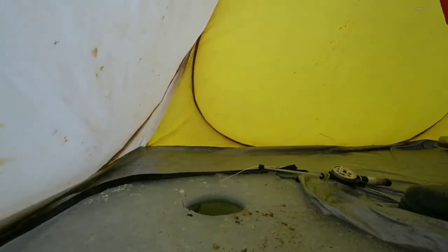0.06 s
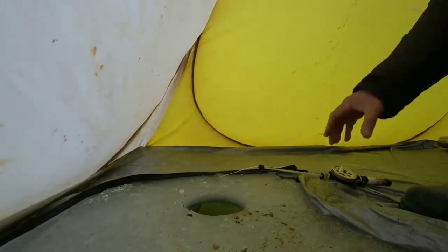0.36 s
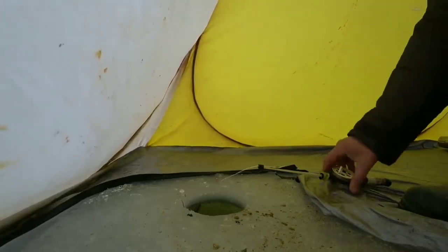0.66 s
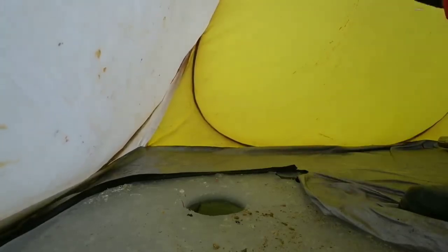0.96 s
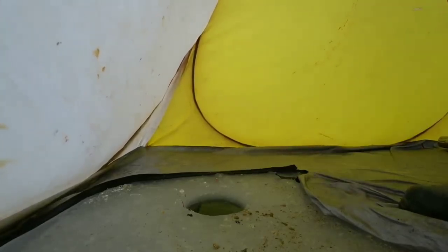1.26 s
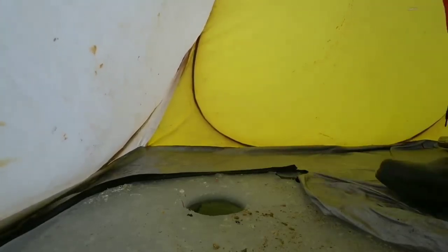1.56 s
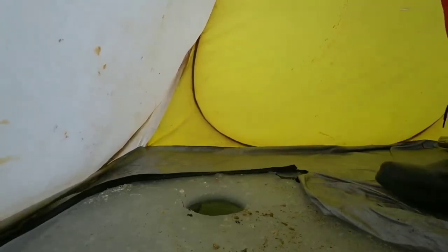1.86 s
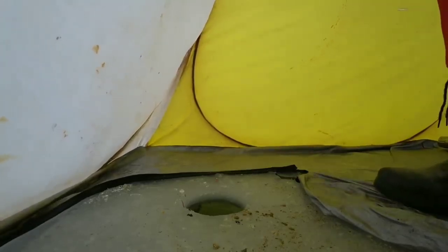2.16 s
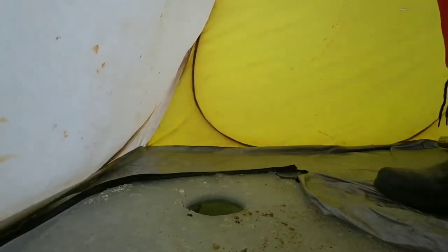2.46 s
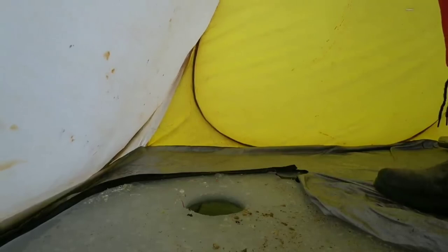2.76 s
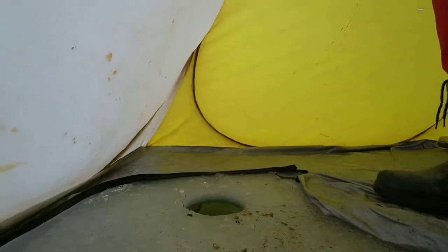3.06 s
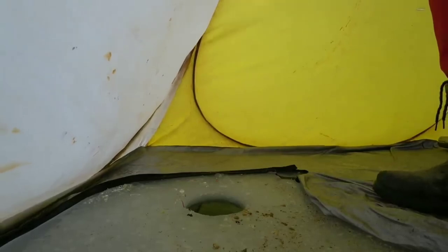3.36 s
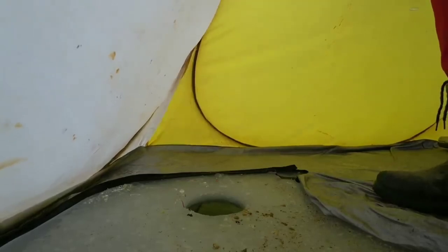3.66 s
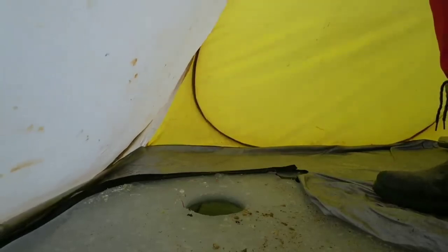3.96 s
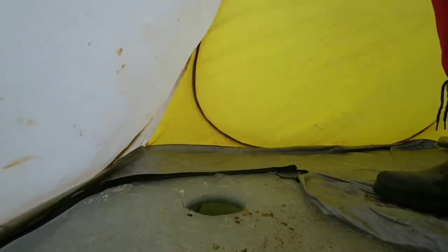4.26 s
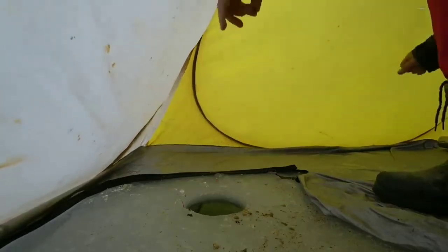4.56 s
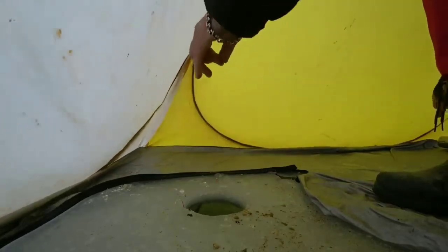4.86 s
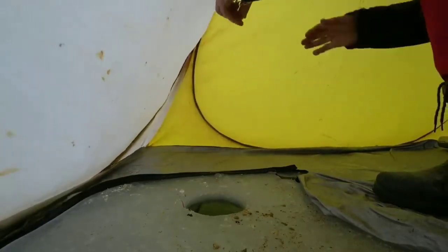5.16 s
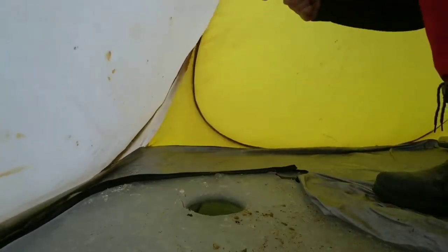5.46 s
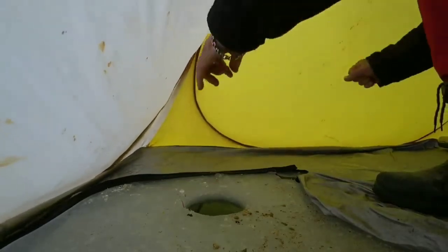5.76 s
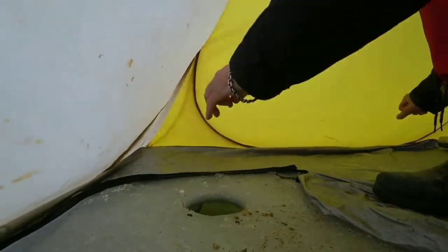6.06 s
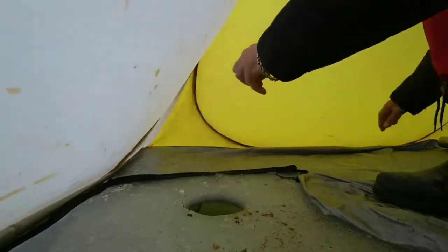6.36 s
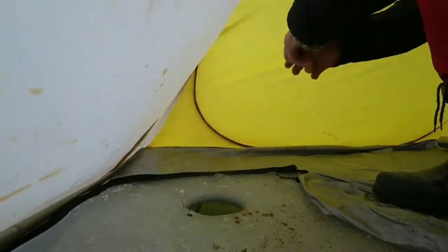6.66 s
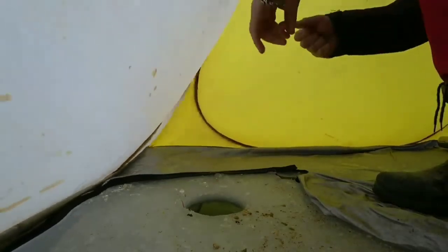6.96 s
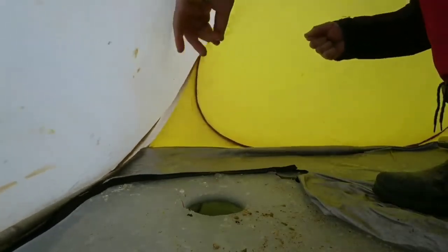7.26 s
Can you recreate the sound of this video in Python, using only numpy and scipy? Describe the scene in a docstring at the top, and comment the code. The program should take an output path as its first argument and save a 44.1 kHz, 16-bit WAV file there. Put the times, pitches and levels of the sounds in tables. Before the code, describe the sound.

Close, dry rustling and scraping of a nylon jacket fills a small fishing tent, over a faint low wind. After a few sleeve swishes and a short lull come a dull floor knock and a hard click of tackle. Creases snap and small gear taps lightly as the movement picks up. Finally the tent wall heaves with deep, soft thumps and a quick run of taut flaps.

```python
"""A padded jacket moves in a small ice-fishing tent: nylon slides on nylon in tiny stick-slips,
creases buckle and snap, tight cloth squeaks. The loose wall billows and pulls taut, hardest near the end.
A dull floor knock, a clack of hard tackle and light taps of taut fabric and small gear ring as
decaying modes. The thin walls add a very short reverb; wind rumbles low outside."""
import sys
import numpy as np
from scipy import signal
from scipy.fft import rfft, irfft, next_fast_len
from scipy.io import wavfile
from scipy.ndimage import uniform_filter1d, map_coordinates

SR = 44100
rng = np.random.default_rng(int(sys.argv[2]) if len(sys.argv) > 2 else 0)


def file_out(sig):
    """Save sig as 16-bit WAV at sys.argv[1]."""
    # one column per channel
    cols = np.atleast_2d(sig).T
    # limit, then scale
    lim = np.clip(cols, -1, 1)
    pcm = np.round(lim * 32767).astype(np.int16)
    wavfile.write(sys.argv[1], SR, pcm)


N = 326736

# sleeve strokes: (start [s], attack [s], hold [s], 20 dB fade [s], rub [dB], hiss over rub [dB])
SLEEVE_STROKES = [(-0.03, 0.058, 0.053, 0.13, -38, 0.5), (0.21, .13, .33, 1, -50.5, 4),
                  (0.735, 0.14, .2, 0.56, -39.5, -3.5), (1.091, .004, 0.063, 0.31, -35.5, 2.5),
                  (1.304, 0.14, 0.032, 0.22, -38, 3.5), (2.328, .12, 0.065, 0.7, -53, 7.5),
                  (2.746, 0.02, 0.017, 0.23, -44.5, 1.5), (2.93, 0.046, 0.18, .12, -38.5, -1),
                  (3.116, 0.033, .05, 0.34, -37, 0), (3.204, 0.074, 0.24, .13, -39.5, -2),
                  (3.612, 0.071, 0.29, 0.4, -38.5, -2), (4.344, 0.046, 0.25, 0.7, -38.5, 0),
                  (4.694, .05, .06, 0.09, -30, -6), (4.822, 0.049, .12, 1.5, -46.5, -12),
                  (4.976, .14, 0.11, 0.04, -40, 3), (5.16, 0.11, 0.045, 0.2, -35.5, -4),
                  (5.502, .13, 0.035, 0.33, -33, 0.5), (5.898, 0.088, 0.036, .085, -32.5, -8),
                  (6.2, 0.0058, 0.021, .13, -31, -7.5), (6.339, 0.024, 0.011, 0.08, -29, -6),
                  (6.392, 0.033, .17, 2, -40.5, -4), (6.573, 0.13, 0.16, .2, -33, -4),
                  (6.77, 0.06, .025, 0.27, -31, -4), (6.945, 0.014, 0.15, .15, -30, -3),
                  (7.133, 0.013, 0.067, 0.5, -32.5, -2.5)]
# rustle between strokes: (time [s], level [dB])
IDLE_RUSTLE = [(0.0, -50.5), (1.7, -50.5), (1.78, -54.5), (2.3, -57.5), (2.85, -53), (3.6, -55.5),
               (4.15, -48.5), (5.45, -49.5), (5.9, -45.5), (7.41, -50.5)]
# arm position: (time [s], left over right [dB])
ARM_PAN = [(0.0, -3.5), (4.62, -1.5), (4.7, 1), (5.16, -2), (5.26, 0), (5.86, -2.5), (5.92, 2), (6.27, 0.0),
           (6.33, 4.0), (6.67, -4.5), (7.04, 0), (7.41, -2.5)]
# nylon rub: (frequency [Hz], level [dB])
RUB_SPECTRUM = [(300, -28), (700, -9), (1100, -4), (1600, -0.5), (2100, -1), (2700, 0), (3500, -3.5),
                (4200, -9), (6000, -11), (11000, -47)]
# nylon hiss: (frequency [Hz], level [dB])
HISS_SPECTRUM = [(2000, -17), (3500, -2), (4600, -1.5), (5600, 2.5), (7200, 2), (8300, -1.5), (9300, -6.5),
                 (10400, -2), (11300, -13)]
# buckling creases: (time [s], level [dB], centre [Hz])
CREASE_SNAPS = [(1.0178, -19, 5000), (1.0235, -22, 2400), (1.387, -21, 1620), (1.567, -20.5, 1800),
                (2.116, -28, 1470), (2.533, -27, 1790), (3.728, -21, 2850), (4.273, -23.5, 3560),
                (4.358, -22, 3400), (4.38, -19, 1500), (4.678, -9.5, 3400), (4.7024, -10.5, 3500),
                (4.784, -12, 2900), (5.389, -19.5, 2000), (5.466, -22.5, 2520), (5.71, -22, 2000),
                (6.151, -19.5, 2800), (6.478, -16, 2000), (6.857, -11, 2400)]
# crease snap and floor rattle: (frequency [Hz], level [dB])
SNAP_SPECTRUM = [(150, -30), (600, 7), (1500, 0), (2600, 3), (3600, 2.5), (4300, -5.5), (7500, -1),
                 (11000, -18)]
# quick sleeve brushes: (time [s], level [dB], length [s], centre [Hz])
SLEEVE_SCUFFS = [(0.77, -36, 0.026, 1800), (0.813, -35, .025, 3970), (0.877, -33, 0.049, 8400),
                 (1.096, -25.5, 0.014, 6040), (1.261, -35, 0.017, 1940), (1.556, -34.5, 0.06, 2800),
                 (1.714, -38.5, 0.042, 1870), (2.123, -45.5, .04, 2800), (2.636, -39.5, 0.038, 3150),
                 (2.687, -41, 0.041, 2970), (3.1, -27, 0.027, 4970), (3.109, -26, .025, 2200),
                 (3.158, -29.5, 0.038, 2270), (3.908, -34, 0.037, 1500), (4.678, -27, 0.028, 2600),
                 (6.14, -37, .035, 2480), (6.203, -35, .05, 1200), (6.349, -28.5, 0.037, 1490),
                 (6.441, -32.5, 0.026, 2980), (7.026, -23, .04, 2000)]
# nylon squeaks: (time [s], level [dB], length [s], start pitch [Hz], end pitch [Hz], overtones [dB])
NYLON_SQUEAKS = [(1.045, -39.5, 0.14, 2600, 2580, -14), (1.447, -32, 0.069, 4080, 4310, -4),
                 (2.974, -37.5, 0.046, 1120, 1010, -21), (3.182, -34, 0.048, 3440, 3400, -14),
                 (3.237, -41, 0.066, 2660, 2720, -21), (3.78, -39, 0.068, 1147, 1186, -13),
                 (4.467, -38, 0.08, 3160, 2300, -23)]
# wall heaves: (centre [s], length [s], billow [dB], flutter over billow [dB])
WALL_HEAVES = [(0.9, 0.083, -40.5, -10), (1.14, 0.099, -45.5, 6.5), (2.702, 0.062, -44, -13),
               (2.975, 0.069, -39.5, -0.5), (3.38, .1, -53, 9.5), (3.515, 0.049, -41, -21),
               (3.854, 0.17, -44.5, -6), (4.577, 0.079, -30.5, -8), (4.767, 0.14, -38.5, 3.5),
               (4.884, 0.043, -32, -15), (5.302, 0.16, -40, 3.5), (5.558, .07, -27, -7),
               (5.677, 0.13, -31.5, -2), (5.99, 0.068, -36.5, -1.5), (6.305, 0.2, -29, -7.5),
               (6.473, 0.11, -27.5, -8.5), (6.685, 0.16, -34, 0.5), (6.846, .07, -31.5, -8),
               (7.032, 0.14, -14, -8.5), (7.227, 0.13, -16, -7.5), (7.405, 0.033, -29, 1.5)]
# wall motion between heaves: (time [s], billow [dB])
WALL_STIR = [(0.0, -51), (2.3, -55.5), (3.2, -58), (4.2, -45.5), (4.6, -41.5), (5.45, -39.5), (5.95, -38.5),
             (6.75, -34.5), (7.41, -24.5)]
# wall billow: (frequency [Hz], level [dB])
BILLOW_SPECTRUM = [(10, -21), (28, 3), (50, -2.5), (80, -3.5), (125, -4), (190, -8.5), (280, -15.5),
                   (500, -29.5), (1500, -59)]
# wall flutter: (frequency [Hz], level [dB])
FLUTTER_SPECTRUM = [(80, -19), (200, -7), (320, 0.5), (480, -4.5), (720, -5.5), (1000, -10), (1600, -19),
                    (4000, -50)]
# air pushed by the wall: (frequency [Hz], level [dB])
DRAUGHT_SPECTRUM = [(20, 10), (70, -10.5), (160, -5.5), (300, 0.5), (700, -18), (2000, -60)]
# wall pulling taut: (time [s], level [dB], pitch [Hz])
WALL_FLAPS = [(0.118, -31, 327), (1.136, -21.5, 750), (3.914, -23, 480), (4.378, -32, 750),
              (4.439, -20, 450), (4.445, -22, 720), (4.563, -20, 263), (4.678, -20, 437), (4.886, -27, 337),
              (5.462, -21, 720), (5.481, -23, 396), (5.712, -13.5, 655), (5.734, -20, 610),
              (6.151, -20.5, 170), (6.402, -16, 480), (6.879, -14, 370), (6.962, -6.5, 500),
              (7.04, -4.5, 820), (7.052, -9, 447), (7.164, -3, 360), (7.2005, 1.5, 750), (7.2047, -4, 336),
              (7.232, -10, 306), (7.287, -16, 218)]
# puff of a flap: (frequency [Hz], level [dB])
PUFF_SPECTRUM = [(100, -7.5), (700, -1), (1500, -5.5), (2400, -18), (8000, -55)]
# floor knock modes: (frequency [Hz], level [dB], T60 [s])
KNOCK_MODES = [(148, -7.5, 0.032), (215, -9.5, 0.04), (346, -16.5, 0.038), (490, -5, 0.016),
               (645, -1.5, 0.011), (1130, -11.5, 0.017), (1500, -20, 0.018), (2590, -29.5, 0.14)]
# tackle modes: (frequency [Hz], bandwidth [Hz], level [dB])
TACKLE_MODES = [(2030, 29, 0), (2210, 26, -3), (2520, 140, -7), (2730, 26, -10), (2900, 22, -11),
                (3160, 41, -9), (3690, 30, -6), (4270, 100, -4), (4530, 49, -9), (4800, 41, -4),
                (5260, 36, -11), (5490, 34, -9), (5720, 62, -7), (6020, 36, -12), (6490, 36, -15),
                (6720, 19, -17), (6900, 31, -10), (7350, 61, -13)]
# tackle contacts: (time [s], level [dB])
TACKLE_CONTACTS = [(3.1125, -30), (3.1148, -12), (3.1195, -17.5), (3.163, -34), (3.177, -33)]
# tackle contact noise: (frequency [Hz], level [dB])
CRACK_SPECTRUM = [(200, -40), (900, 2.5), (1600, -10), (2100, 6), (3200, 0), (5000, -2), (7300, -13),
                  (7900, -13), (11000, -14)]
# ringing taps and chinks of taut fabric and small gear: (time [s], level [dB], pitch [Hz], T60 [s])
LIGHT_TAPS = [(3.728, -25, 2900, .035), (4.38, -23, 770, 0.047), (4.379, -25, 1360, 0.045),
              (5.027, -22, 5360, 0.03), (5.035, -19.5, 1890, 0.051)]
# tent reverb: (frequency [Hz], T60 [s])
TENT_DECAY = [(150, 0.026), (1500, 0.028), (4000, 0.073), (11000, 0.14)]
# wind outside: (frequency [Hz], level [dB])
WIND_SPECTRUM = [(15, -10), (35, -10), (70, 0), (130, -0.5), (220, -3.5), (330, -7), (600, -16),
                 (2000, -25), (10000, -35.5)]
# left-right likeness: (frequency [Hz], correlation [-])
STEREO_CORRELATION = [(60, .96), (250, .9), (500, .82), (1200, .6), (2500, .68), (9000, .72)]

CONTROL_S = np.arange(0, N / SR, 1 / 500)


def amp(db):
    """Decibels to gain."""
    return 10 ** (np.asarray(db) / 20)


def unit(x):
    """Scale to rms 1."""
    return x / np.sqrt(np.mean(x ** 2) + 1e-20)


def along(points, hz):
    """Interpolate a table on a log frequency axis."""
    knots_hz, values = np.transpose(points)
    return np.interp(np.log(hz + 1), np.log(knots_hz + 1), values)


def power_to_db(power):
    """Control-rate power to dB per sample."""
    return np.interp(np.arange(N) / SR, CONTROL_S, 10 * np.log10(power))


def wobble(rate_hz, size=N):
    """Smooth random curve, rate_hz knots a second."""
    knots = rng.standard_normal(int(size * rate_hz / SR) + 4)
    return map_coordinates(knots, [np.arange(size) * rate_hz / SR])


def filtered(x, response):
    """Apply a frequency response."""
    size = x.shape[-1]
    padded = next_fast_len(size + 8192)
    return irfft(rfft(x, padded) * response(np.fft.rfftfreq(padded, 1 / SR)), padded)[..., :size]


def bandpass(x, centre_hz, q):
    """One broad resonance."""
    return filtered(x, lambda hz: 1 / (1 + 1j * q * (hz / centre_hz - centre_hz / (hz + 1))))


def coloured(x, spectrum):
    """Shape by a spectrum, at rms 1."""
    return unit(filtered(x, lambda hz: amp(along(spectrum, hz))))


def spread(pair):
    """Two independent signals to partly correlated stereo."""
    def weights(hz):
        angle = np.arccos(np.clip(along(STEREO_CORRELATION, hz), -1, 1)) / 2
        return np.array([np.cos(angle), np.sin(angle)])
    mid, side = filtered(pair, weights)
    return np.array([mid + side, mid - side]) / np.sqrt(np.mean(mid ** 2))


def pan(x, right_db):
    """Right over left by right_db."""
    return x * amp(np.array([[-.5], [.5]]) * right_db)


def add(track, start_s, sound):
    """Mix in at start_s."""
    part = track[..., max(round(start_s * SR), 0):][..., :sound.shape[-1]]
    part += sound[..., :part.shape[-1]]


def sleeves(rub_db, hiss_db):
    """Nylon on nylon, with judder: faster sliding is louder and slips more densely."""
    speed = amp((rub_db + 38.5) / 2)
    judder = wobble(70)
    rub = cloth(RUB_SPECTRUM, 450 * speed, grain_db=-3.5, scatter_db=1.5, folds_db=3)
    hiss = cloth(HISS_SPECTRUM, 1500 * speed, grain_db=-8, scatter_db=1.5, folds_db=2.5)
    return amp(rub_db - 0.5 + 1.5 * judder) * rub + amp(hiss_db + 0.5 + 0.84 * judder) * hiss


def stroke_levels(sag_db_per_s=4):
    """Rub and hiss [dB]: each stroke speeds up, slows and dies away; powers add."""
    rub = hiss = amp(np.interp(CONTROL_S, *np.transpose(IDLE_RUSTLE))) ** 2
    for start_s, attack_s, hold_s, fade_s, db, hiss_db in SLEEVE_STROKES:
        t = CONTROL_S - start_s
        sag_db = sag_db_per_s * np.clip(t - attack_s, 0, hold_s)
        fade_db = 20 * np.clip((t - attack_s - hold_s) / fade_s, 0, 10)
        power = (np.clip(t / attack_s, 0, 1) * amp(db - sag_db - fade_db)) ** 2
        rub, hiss = rub + power, hiss + power * amp(hiss_db) ** 2
    return power_to_db(rub), power_to_db(hiss)


def cloth(spectrum, slips_per_s, grain_db, scatter_db, folds_db):
    """Uneven stick-slip impulses over friction noise, coloured by shifting fold resonances."""
    friction = rng.standard_normal((2, N))
    fired = rng.random((2, N)) < slips_per_s / SR
    sizes = amp(scatter_db * np.minimum(rng.exponential(size=(2, N)), 4))
    slips = unit(fired * sizes * rng.choice([-1, 1], (2, N)) / np.sqrt(slips_per_s))
    frames = signal.stft(friction + amp(grain_db) * slips, nperseg=1024)[2]
    folds = uniform_filter1d(rng.standard_normal(frames.shape[1:]), size=5, axis=0)
    folds = unit(uniform_filter1d(folds, size=6, axis=1))
    rustle = signal.istft(frames * amp(folds_db * folds), nperseg=1024)[1][:, :N]
    return spread(coloured(rustle, spectrum))


def creases(t60_s=.028):
    """A crease buckles: one snap, then brief crackle, each around its own pitch."""
    out, t = np.zeros((2, N)), np.arange(SR // 20) / SR
    for start_s, db, centre_hz in CREASE_SNAPS:
        crackle = rng.standard_normal((2, len(t))) * amp(-60 * t / t60_s) * (t > .001)
        crackle[0, SR // 1000] += 4  # the snap
        snap = spread(bandpass(coloured(crackle, SNAP_SPECTRUM), centre_hz, q=0.77))
        add(out, start_s, amp(db) * snap / np.abs(snap).max())
    return out


def scuffs():
    """A sleeve catches and slides off: a burst of broad-band noise."""
    out, t = np.zeros((2, N)), np.arange(SR // 5) / SR
    for start_s, db, length_s, centre_hz in SLEEVE_SCUFFS:
        age = 4 * t / length_s
        noise = spread(bandpass(rng.standard_normal((2, len(t))), centre_hz, q=1.3))
        add(out, start_s, amp(db - 0.5) * age * np.exp(1 - age) * noise)
    return out


def squeaks():
    """Tight nylon sticks and slips at an unsteady, gliding pitch, with two ragged overtones."""
    out, t = np.zeros(N), np.arange(SR // 4) / SR

    def tone(hz, jitter):
        return np.sin(2 * np.pi * np.cumsum(hz * (1 + jitter * wobble(920, len(t)))) / SR)

    for start_s, db, length_s, start_hz, end_hz, overtone_db in NYLON_SQUEAKS:
        progress = np.minimum(t / length_s, 1)
        hz = (start_hz + (end_hz - start_hz) * progress) * (1 + .008 * wobble(60, len(t)))
        voice = tone(hz, jitter=.022)
        voice += amp(overtone_db) * (tone(1.62 * hz, jitter=.015) + .7 * tone(1.81 * hz, jitter=.018))
        swell = np.sqrt(np.abs(np.sin(np.pi * progress)))
        add(out, start_s, amp(db + 2 + 2.5 * wobble(200, len(t))) * swell * voice)
    return out


def wall(billow_db, flutter_db):
    """The loose wall billows and flutters in soft pops; hard shakes push air unevenly left and right."""
    billow = amp(billow_db + 0.75 + 1.4 * wobble(18))
    billow = billow * cloth(BILLOW_SPECTRUM, slips_per_s=60, grain_db=-5, scatter_db=5, folds_db=1)
    flutter = amp(flutter_db - 1 + 1.75 * wobble(30))
    flutter = flutter * cloth(FLUTTER_SPECTRUM, 260, grain_db=-1.5, scatter_db=2.5, folds_db=3)
    draught = amp(1.18 * billow_db - 6) * coloured(rng.standard_normal((2, N)), DRAUGHT_SPECTRUM)
    return pan(billow + flutter + draught, right_db=2.5)


def wall_levels(rub_db, stir_flutter_db=-6.5, drag_db=-10):
    """Billow and flutter [dB]: bell-shaped heaves over a growing stir; sleeves drag flutter along."""
    billow = amp(np.interp(CONTROL_S, *np.transpose(WALL_STIR))) ** 2
    dragged = amp(rub_db[(CONTROL_S * SR).astype(int)] + drag_db) ** 2
    flutter = billow * amp(stir_flutter_db) ** 2 + dragged
    for centre_s, length_s, db, flutter_db in WALL_HEAVES:
        power = amp(db) ** 2 * np.exp(-(2 * (CONTROL_S - centre_s) / length_s) ** 2)
        billow, flutter = billow + power, flutter + power * amp(flutter_db) ** 2
    return power_to_db(billow), power_to_db(flutter)


def flaps(t60_cycles=13, attack_s=0.00038):
    """A panel pulls taut: a few cycles of its note, a push of air, a dull puff."""
    out, t = np.zeros(N), np.arange(SR // 10) / SR
    for start_s, db, hz in WALL_FLAPS:
        note = np.sin(2 * np.pi * hz * t) * amp(-60 * t * hz / t60_cycles)
        push = np.sin(2 * np.pi * hz * t / 3.8) * amp(-4 - 60 * t / 0.026)
        puff = coloured(rng.standard_normal(len(t)), PUFF_SPECTRUM) * amp(-13 - 60 * t / .04)
        add(out, start_s, amp(db) * (note + push + puff) * (1 - np.exp(-t / attack_s)))
    return pan(out, right_db=3.5)


def knock(start_s=2.7541, rebound_s=.0062):
    """A dull blow on the floor: modes build in about half a cycle; one rebound, a faint rattle."""
    out, t = np.zeros(N), np.arange(SR // 5) / SR
    blow = sum(amp(db - 60 * t / t60_s) * np.sin(2 * np.pi * hz * t) * (1 - np.exp(-3 * hz * t))
               for hz, db, t60_s in KNOCK_MODES)
    rattle = coloured(rng.standard_normal(len(t)), SNAP_SPECTRUM) * amp(-31.5 - 60 * t / 0.12)
    add(out, start_s, blow + rattle)
    add(out, start_s + rebound_s, amp(-21) * blow)
    return pan(out, right_db=6)


def tackle(attack_s=.0006, crack_t60_s=0.074):
    """Hard tackle chatters on landing: each contact rings the modes anew; broad ones die first."""
    out, t = np.zeros((2, N)), np.arange(SR // 4) / SR
    hz, width_hz, level_db = np.transpose(TACKLE_MODES)[:, :, None]
    decays = amp(level_db) * width_hz / width_hz.mean() * np.exp(-np.pi * width_hz * t)
    for start_s, db in TACKLE_CONTACTS:
        phase = rng.uniform(0, 2 * np.pi, hz.shape) + rng.normal(0, 0.3, (2, *hz.shape))
        strengths = amp(rng.normal(0, 1.2, phase.shape))
        ring = (decays * strengths * np.sin(2 * np.pi * hz * t + phase)).sum(axis=1)
        noise = spread(coloured(rng.standard_normal((2, len(t))), CRACK_SPECTRUM))
        crack = .8 * noise * amp(-60 * t / crack_t60_s)
        add(out, start_s, amp(db + 2) * (ring + crack) * (1 - np.exp(-t / attack_s)))
    return pan(out, right_db=3.5)


def light_taps(attack_s=0.0012):
    """Light ringing taps and chinks of taut fabric and small gear: short decaying modes."""
    out, t = np.zeros(N), np.arange(SR // 8) / SR
    for start_s, db, hz, t60_s in LIGHT_TAPS:
        mode = amp(db - 60 * t / t60_s) * np.sin(2 * np.pi * hz * t)
        add(out, start_s, mode * (1 - np.exp(-t / attack_s)))
    return out


def tent_reverb(x):
    """Thin walls return a very short tail, 5 ms late."""
    hz, t, frames = signal.stft(rng.standard_normal((2, SR // 4)), SR, nperseg=256)
    decay = amp(-60 * t / along(TENT_DECAY, hz)[:, None])
    tail = signal.istft(frames * decay, SR, nperseg=256)[1]
    delayed = np.pad(x.mean(axis=0), (SR // 200, 0))[None]
    return signal.fftconvolve(delayed, tail / np.linalg.norm(tail[0]), axes=1)[:, :N]


def wind(level_db=-44):
    """Wind outside: low noise, slowly wavering."""
    gain = amp(level_db + wobble(2.05))
    rumble = spread(coloured(rng.standard_normal((2, N)), WIND_SPECTRUM))
    return pan(gain * rumble, right_db=2)


def scene():
    """Jacket and light taps pan with the arms; the wall is on the right; only short sounds get reverb."""
    arm_right_db = -np.interp(np.arange(N) / SR, *np.transpose(ARM_PAN))
    rub_db, hiss_db = stroke_levels()
    jacket = pan(sleeves(rub_db, hiss_db), arm_right_db)
    shaking = wall(*wall_levels(rub_db))
    rumble = wind()
    hits = flaps() + knock() + tackle()
    hits += pan(scuffs() + squeaks() + light_taps() + creases(), arm_right_db)
    return jacket + shaking + hits + amp(-12) * tent_reverb(hits) + rumble


def record(dry):
    """Soft peak limit, then band limit."""
    ceiling, highpass_hz, top_hz = .95, 12, 11170
    limited = dry / (1 + np.abs(dry / ceiling) ** 8) ** (1 / 8)
    return filtered(limited, lambda hz: (hz < top_hz) * hz / np.hypot(hz, highpass_hz))


dry = scene()
out = record(dry)
file_out(out)
```